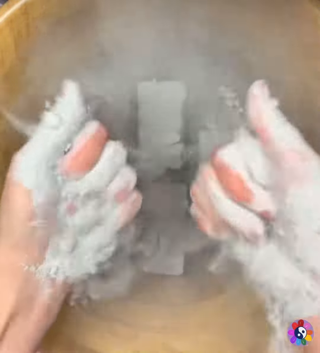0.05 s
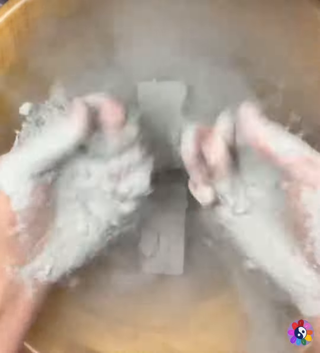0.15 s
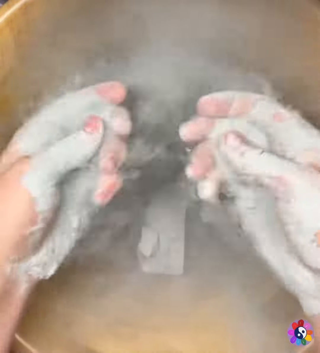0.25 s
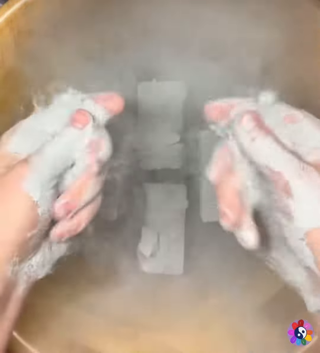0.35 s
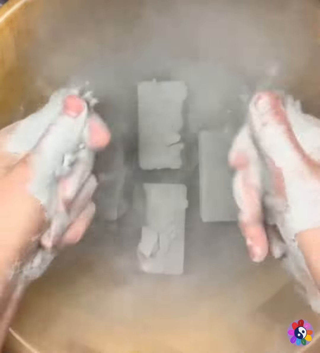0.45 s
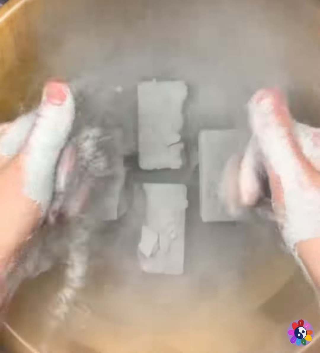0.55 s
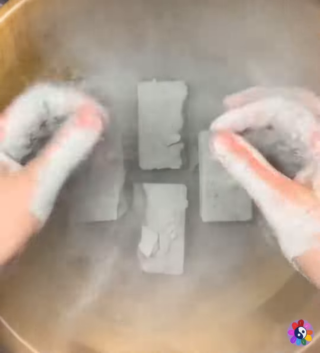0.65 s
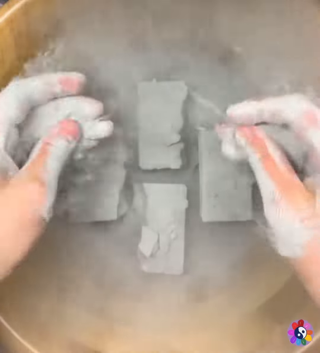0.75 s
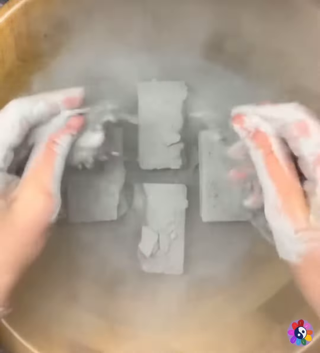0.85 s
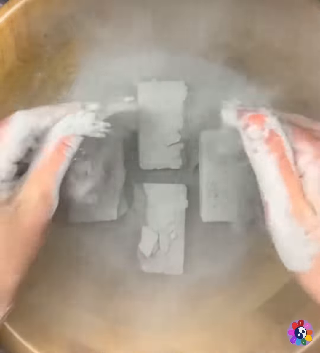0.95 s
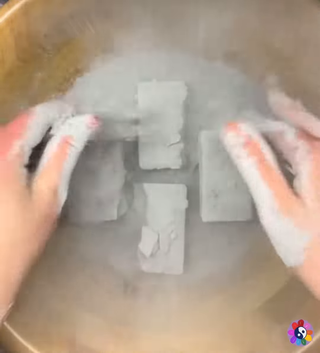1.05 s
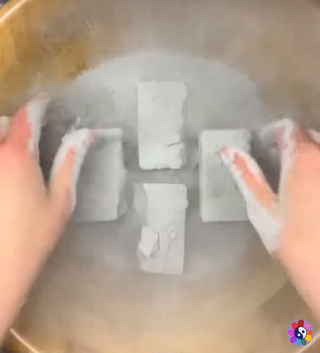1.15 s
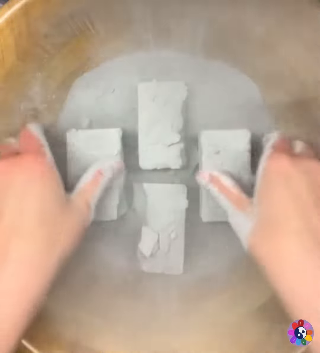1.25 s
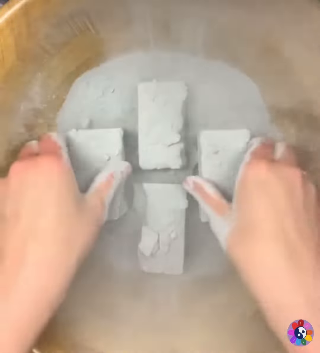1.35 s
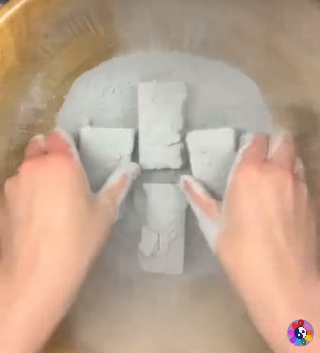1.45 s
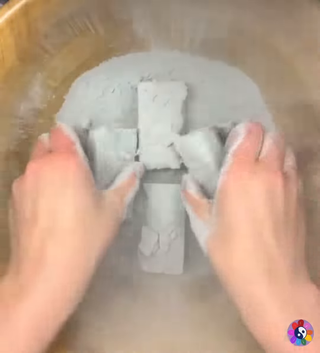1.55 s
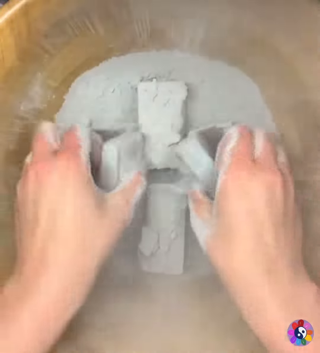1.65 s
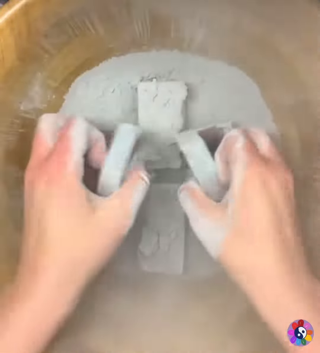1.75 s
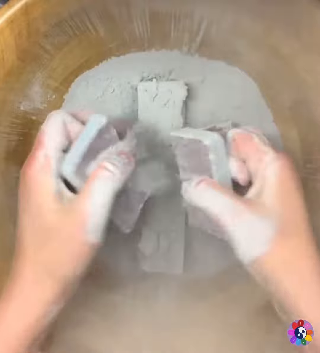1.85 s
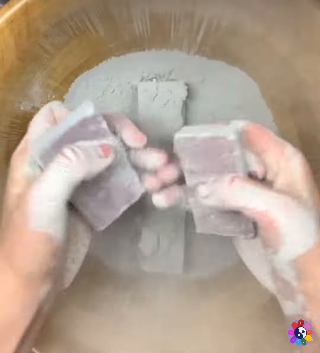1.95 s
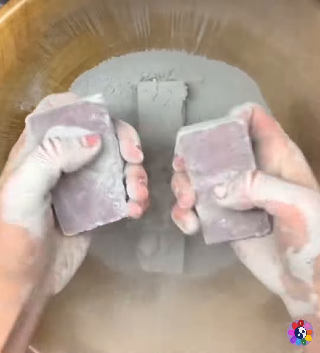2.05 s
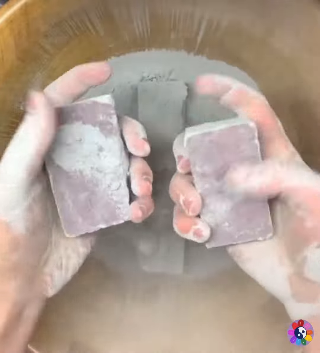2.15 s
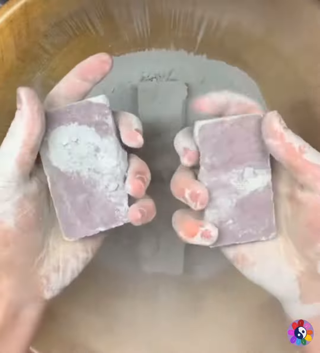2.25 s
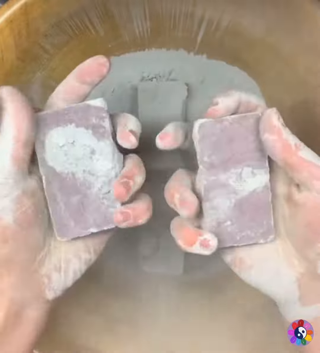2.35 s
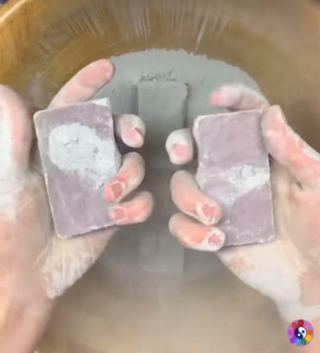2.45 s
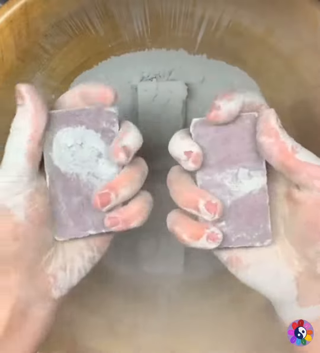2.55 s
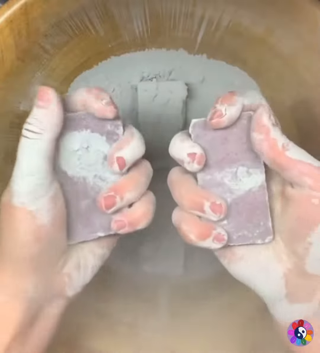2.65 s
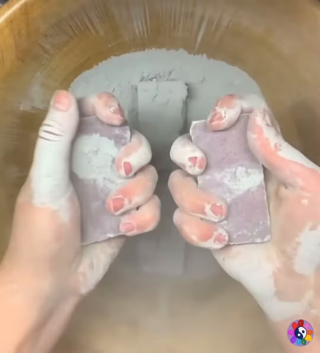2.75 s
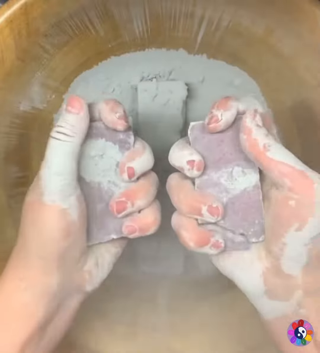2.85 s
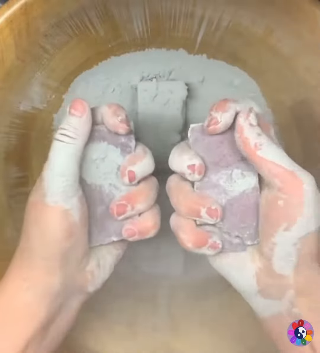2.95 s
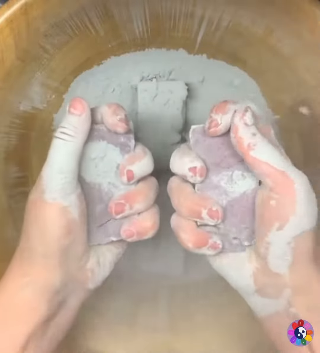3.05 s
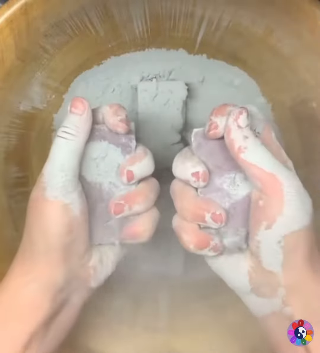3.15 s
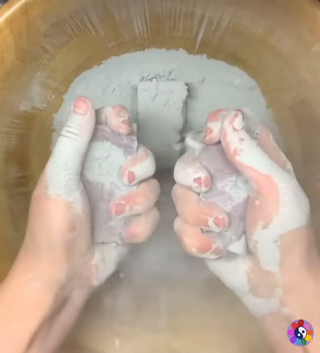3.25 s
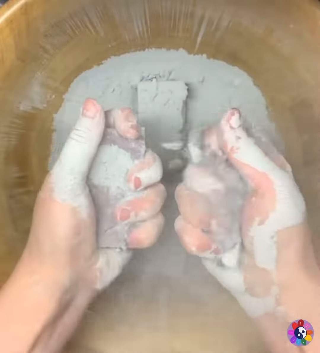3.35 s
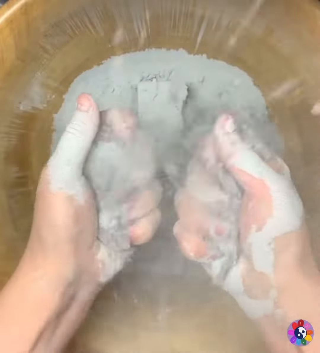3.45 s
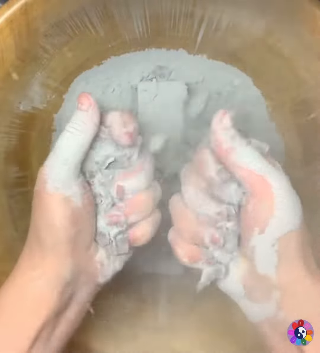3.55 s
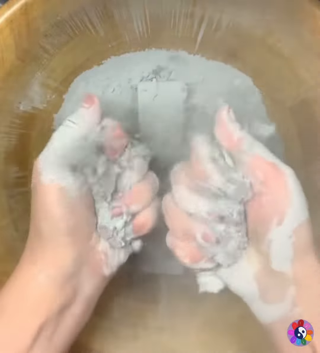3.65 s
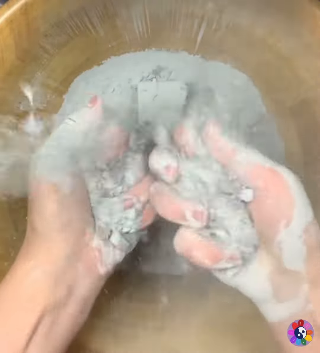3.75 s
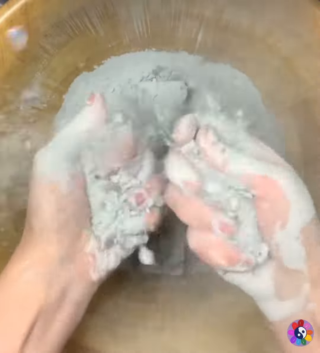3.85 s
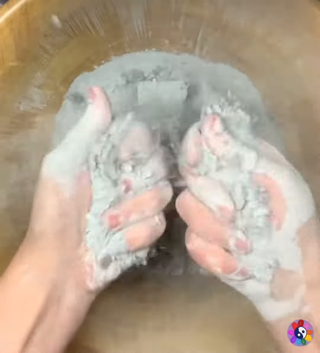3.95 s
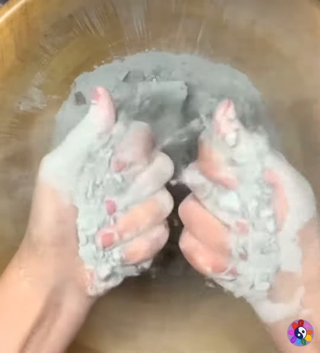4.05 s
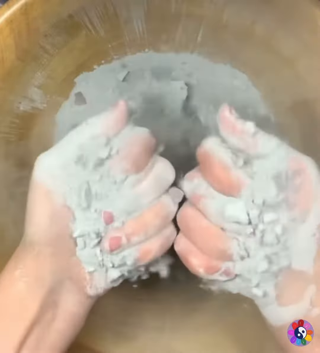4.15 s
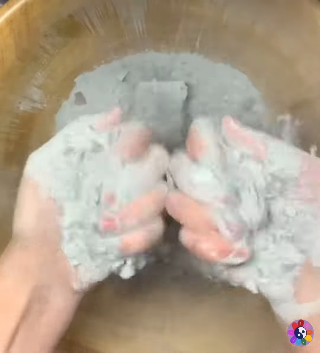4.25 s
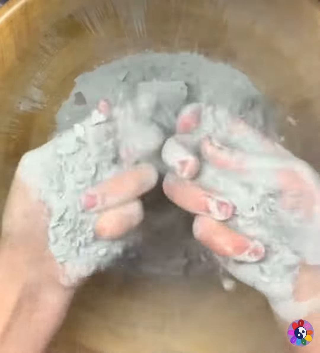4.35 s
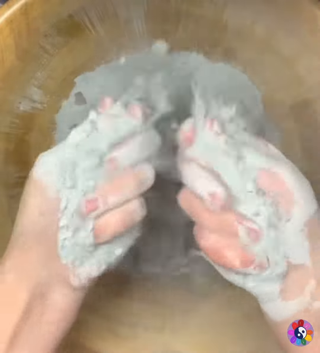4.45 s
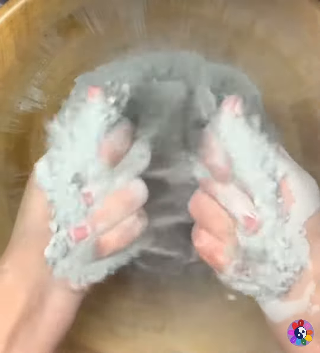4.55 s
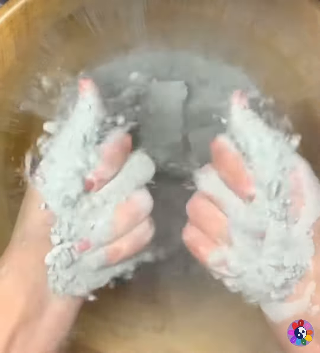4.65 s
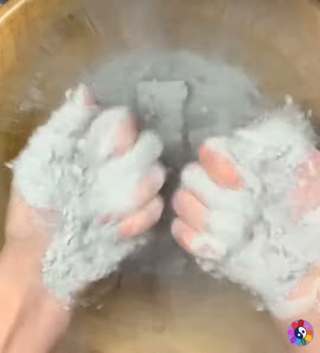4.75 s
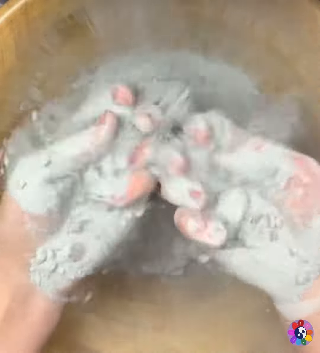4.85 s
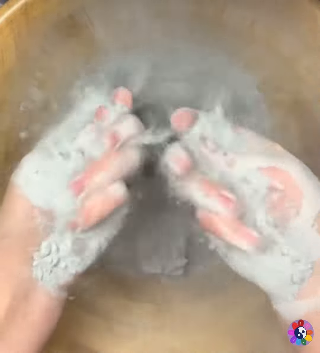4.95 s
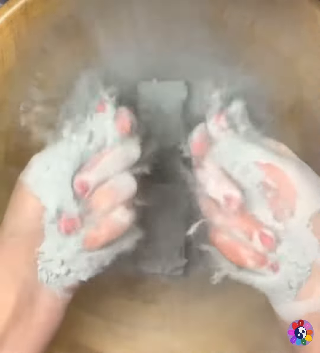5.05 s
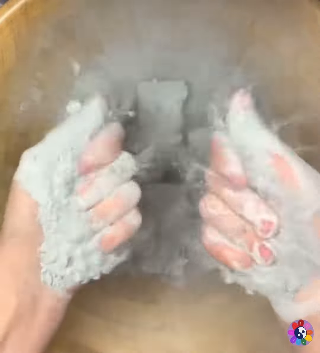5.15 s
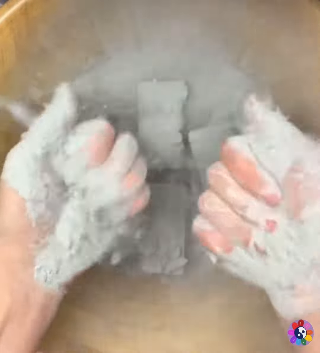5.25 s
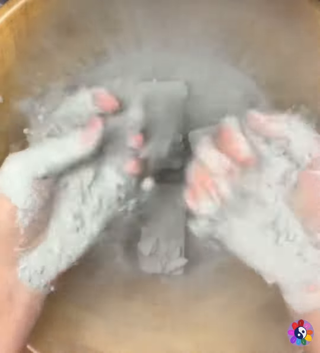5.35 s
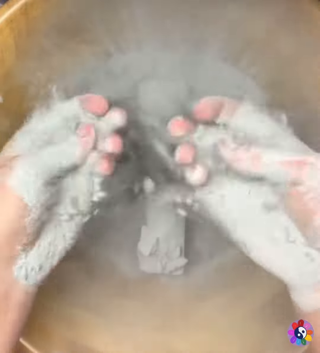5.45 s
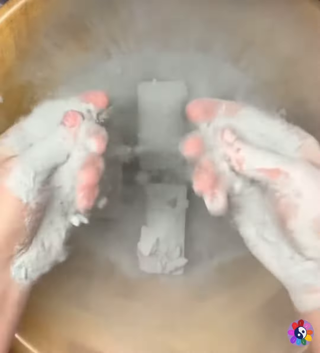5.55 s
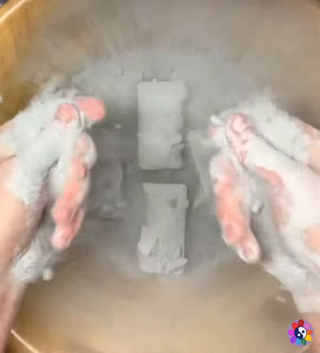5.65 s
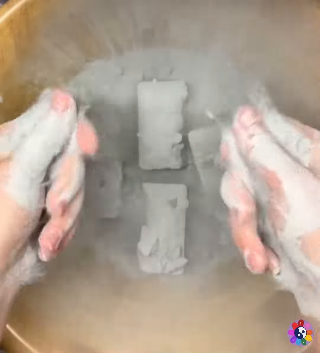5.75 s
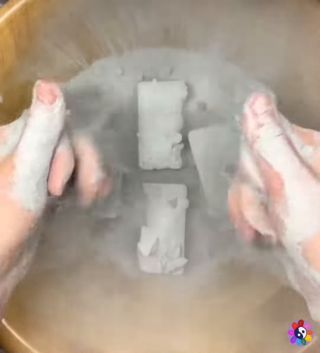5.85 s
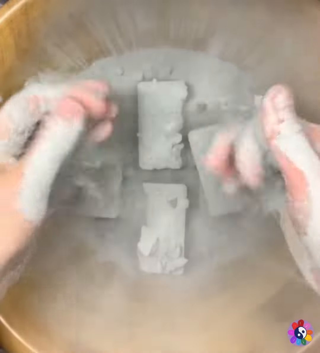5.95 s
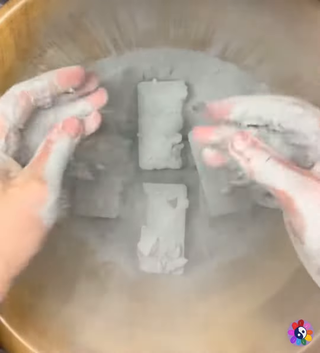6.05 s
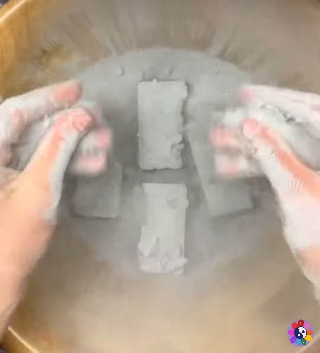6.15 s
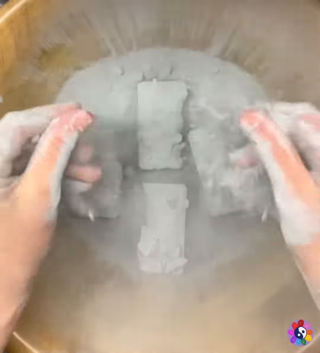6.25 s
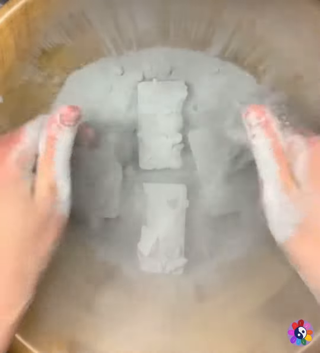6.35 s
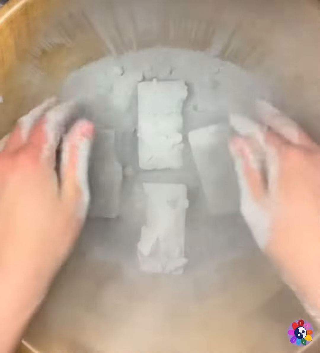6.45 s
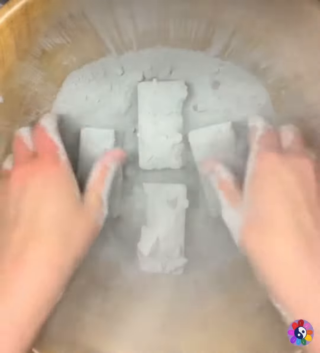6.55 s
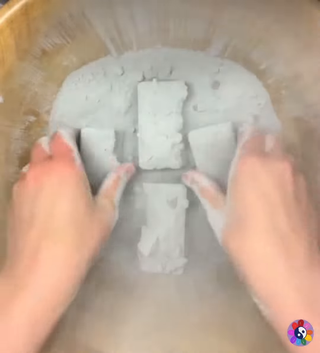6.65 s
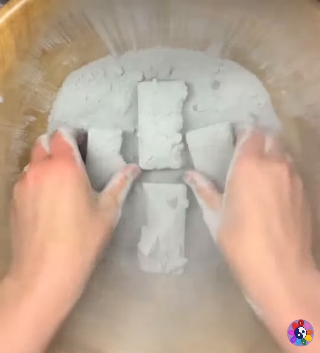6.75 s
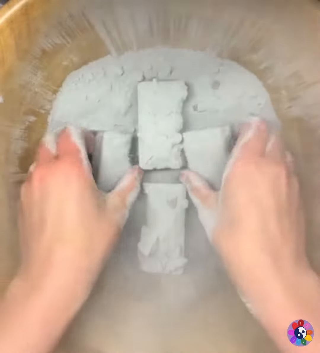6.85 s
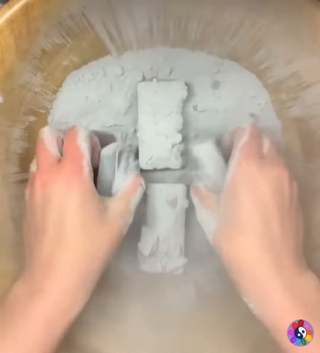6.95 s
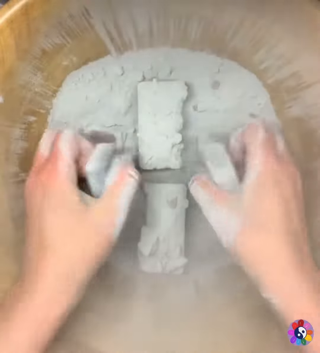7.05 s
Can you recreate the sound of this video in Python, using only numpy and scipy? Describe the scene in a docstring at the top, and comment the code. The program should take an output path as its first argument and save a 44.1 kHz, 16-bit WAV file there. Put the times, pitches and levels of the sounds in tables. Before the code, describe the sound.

Close to the microphone in a quiet room, dry chalk crunches and trickles between fingers into a deep bowl. Several hollow thuds follow as more bars are picked up. After a near-silent moment, the bars snap and are ground to powder, crackling and hissing while crumbs patter on the bowl wall. Softer rubbing follows, and a few heavy bumps nudge the bowl on the table.

```python
"""Grit grinds and trickles as two hands crush dry chalk bars to powder over a deep bowl.
The bars crack in short bursts that ring the bowl's air; lumps and powder thud on its wall,
and heavy contacts shove the bowl on the table. All is heard close up, in stereo,
over a quiet room tone."""
import sys
import numpy as np
from scipy import signal
from scipy.fft import rfft, irfft
from scipy.io import wavfile

SR = 44100
rng = np.random.default_rng(int(sys.argv[2]) if len(sys.argv) > 2 else 0)


def output_pcm(signal):
    """Save a mono or channel-first signal as 16-bit PCM at the path in sys.argv[1].

    Samples are clipped to [-1, 1] before scaling.
    """
    pcm = np.clip(np.atleast_2d(signal).T, -1, 1) * 32767
    wavfile.write(sys.argv[1], SR, np.round(pcm).astype(np.int16))


N = 313110

# bowl wall modes: f/Hz, level/dB, t60/s
WALL_MODES = [(215, -3.5, 0.026), (252.3, -13, 0.15), (291.5, -18, 0.08), (387.2, 0.5, 0.096),
              (438, -1.5, 0.087), (458, -7, 0.11), (548, -4, 0.035), (606.6, -3, 0.049), (640, 0, 0.0044)]
# bowl air resonances: f/Hz, width/Hz, level/dB
AIR_MODES = [(1060, 120, -19), (1660, 170, 0), (2060, 260, -6), (2480, 260, -7), (2850, 260, -6),
             (3320, 250, -4), (4030, 300, -10)]
# fine grit spectrum: f/Hz, density/dB
HISS_SPECTRUM = [(900, -32), (2500, -8), (4500, 2), (7600, -1), (9000, 3), (12000, -2), (15500, 0)]


def cracks():
    """A crack builds, snaps through the bar and dies raggedly; crumbs keep breaking off after it."""
    # cracks: t/s, level/dB, treble share/dB, centre f/Hz
    events = [(0.014, -42, -7.5, 3420), (0.069, -36, -6.5, 3310), (0.2563, -30, -8.5, 3180),
              (0.264, -30, -27, 2600), (0.294, -18.5, -39, 1860), (0.3, -23.5, -33, 2000),
              (0.3073, -36, -33, 1900), (0.423, -37.5, -15.5, 1650), (0.56, -26.5, -17.5, 1610),
              (0.673, -30.5, -17, 3670), (0.849, -29.5, -15, 2030), (1.1291, -33.5, -42, 1620),
              (1.179, -37, -14.5, 1620), (1.531, -43, -10, 1360), (1.595, -39, -15.5, 1350),
              (1.758, -42, -38, 1600), (2.0524, -47, -22, 1790), (2.817, -49, -7.5, 1950),
              (2.9868, -39, -12.5, 3460), (3.0804, -47, -13, 3250), (3.129, -27.5, -16, 2110),
              (3.187, -22.5, -15, 1900), (3.211, -44, -20, 1670), (3.265, -46, -28, 1660),
              (3.292, -40.5, -6.5, 3900), (3.309, -40, -21, 3200), (3.341, -37, -29, 3320),
              (3.355, -24.5, -35, 1650), (3.3621, -30, -19, 2800), (3.371, -33, -15, 1700),
              (3.4048, -26, -24, 1580), (3.426, -27, -21, 2650), (3.473, -35.5, -19, 2900),
              (3.5083, -37, -13, 2010), (3.441, -45, -23, 1700), (3.5782, -30, -16.5, 2560),
              (3.623, -34.5, -11.5, 1730), (3.628, -26, -25, 1540), (3.634, -36, -29, 1590),
              (3.649, -45, -8, 3300), (3.673, -29, -25, 1600), (3.704, -28, -18, 1870),
              (3.754, -40, -21, 2620), (3.7905, -29, -20, 3040), (3.8512, -36, -7, 3260),
              (3.8892, -24, -23, 1530), (3.9464, -26.5, -27, 3300), (3.9555, -24.5, -24, 3320),
              (3.9865, -44, -12, 1610), (4.0184, -28.5, -18, 2320), (4.0256, -35.5, -17, 2600),
              (4.066, -46, -8, 3400), (4.096, -27.5, -15.5, 3040), (4.0998, -51, -25, 2600),
              (4.363, -23.5, -15, 3820), (4.374, -20.5, -19.5, 3560), (4.409, -43, -18, 3300),
              (4.426, -38, -14.5, 1680), (4.457, -48, -13, 3300), (4.469, -40, -5.5, 2600),
              (4.474, -35, -32, 1660), (4.5165, -20, -26, 2490), (4.518, -10, -38, 2160),
              (4.542, -40, -16, 1700), (4.731, -27.5, -20, 2260), (4.777, -32.5, -7, 2900),
              (4.799, -23.5, -17, 2280), (4.8295, -31, -34, 1800), (4.845, -39, -8, 3330),
              (4.9204, -32.5, -6, 3140), (4.9504, -39, -5.5, 1940), (5.2061, -26, -32, 2670),
              (5.467, -33.5, -19.5, 3470), (5.5036, -43, -8.5, 2170), (5.585, -34.5, -17, 3060),
              (6.0352, -36.5, -10, 1920), (6.15, -42, -33, 1560), (6.384, -40, -19, 1680),
              (6.427, -29.5, -15, 2160), (6.53, -37.5, -25, 2760), (6.731, -47.5, -28, 1540),
              (7.003, -29, -32, 1300), (7.057, -31, -27, 1420)]
    rise_s, snap_s, crack_t60_s, crumb_t60_s = 0.0008, 0.000053, 0.019, 0.13
    t = np.arange(int(0.1 * SR)) / SR
    hz, width_hz, air_db = np.transpose(AIR_MODES)
    body, strikes = np.zeros((2, len(hz), N + len(t)))
    treble, ticks = np.zeros((2, N + len(t)))
    since_s = t - 0.006  # the bar parts at 0
    after_s = np.maximum(since_s, 0)
    rise = np.exp(np.minimum(since_s, 0) / rise_s)
    snap = 0.5 * np.exp(-(since_s / snap_s) ** 2)
    decay, crumb_decay = from_db(-60 * after_s / crack_t60_s), from_db(-60 * after_s / crumb_t60_s)
    uneven_db = 1.5 * rng.standard_normal((len(events), len(hz)))
    spurts = np.pad(from_db(3.3 * drift(130)), (0, len(t)), "edge")
    for (s, db, treble_db, centre_hz), own_db in zip(events, uneven_db):
        start = round((s - 0.005) * SR)
        span, parting = slice(start, start + len(t)), start + round(0.006 * SR)
        crumb_share = from_db(-8 - 0.33 * (db + 34))  # smaller under loud cracks
        burst = snap + rise * (decay + crumb_share * crumb_decay * spurts[span])
        # each fragment size favours its own resonance
        mode_gains = from_db(db - 7 * np.log2(hz / centre_hz) ** 2 + own_db)
        body[:, span] += mode_gains[:, None] * burst
        strikes[:, parting] += mode_gains
        treble[span] += from_db(db + treble_db) * burst
        ticks[parting] += from_db(db + treble_db)
    noise = from_db(1.16 * drift(210)) * rng.standard_normal((2, N))
    rasp = 0
    struck = from_db(-15) * ring(strikes[1, :N], hz[1], t60_s=0.07)  # main resonance lingers
    for k in range(len(hz)):
        gain = (-1) ** k * from_db(air_db[k])
        rasp += gain * resonance(body[k, :N] * noise, hz[k], width_hz[k])
        struck += gain * ring(strikes[k, :N], hz[k], t60_s=1.55 / width_hz[k])
    # small fragments radiate little below the main resonance
    air = butter(rasp + from_db(-5) * struck * [[1], [0.4]], 1400, "high")
    jolt = butter(body[0, :N] * noise, [250, 1000], "band")  # the bar jolts in the hand
    tick = butter(ticks[:N], 3000, "high") * [[1], [0.3]]
    hiss = treble[:N] * unit_rms(colour(noise, HISS_SPECTRUM[:3] + [(16000, -6.5)]))
    return from_db(6) * air + from_db(-9) * jolt + from_db(8) * tick + from_db(5.5) * hiss


def thuds():
    """A lump gives a short pat at its own pitch and leaves the nearby wall modes ringing."""
    # lumps and fingers on the bowl: t/s, level/dB, centre f/Hz
    knocks = [(0.096, -37.5, 347), (0.148, -36, 416), (.296, -21.5, 450), (0.332, -33.5, 464),
              (.443, -34, 450), (.56, -35, 424), (0.676, -35.5, 404), (0.713, -39.5, 400),
              (0.772, -37, 394), (1.145, -31.5, 423), (1.473, -42, 390), (1.527, -31.5, 374),
              (1.558, -35, 406), (1.597, -17, 414), (1.602, -18.5, 380), (1.622, -24.5, 408),
              (1.674, -20, 366), (1.695, -19, 380), (1.72, -32.5, 356), (1.748, -36.5, 395),
              (2.052, -42.5, 394), (2.815, -38.5, 290), (2.986, -47, 660), (3.187, -24.5, 510),
              (3.368, -24.5, 736), (3.403, -32.5, 660), (3.424, -31, 580), (3.441, -32, 590),
              (3.478, -20, 409), (3.522, -31, 406), (3.6, -35, 330), (3.623, -33, 375), (3.656, -28, 415),
              (3.674, -25.5, 424), (3.774, -26.5, 430), (3.812, -34, 412), (3.827, -28.5, 400),
              (3.891, -25.5, 548), (3.909, -23.5, 440), (3.953, -29.5, 422), (3.98, -24, 434),
              (4.121, -18.5, 432), (4.306, -29, 413), (4.321, -25, 403), (4.41, -26.5, 407),
              (4.436, -28, 430), (4.496, -35, 453), (4.517, -26, 400), (4.556, -29.5, 397),
              (4.659, -31.5, 417), (4.68, -33.5, 420), (4.708, -35, 422), (4.732, -29.5, 443),
              (4.756, -31, 418), (4.8, -25.5, 520), (4.923, -27.5, 477), (5.207, -30, 426),
              (5.312, -35.5, 392), (5.333, -40, 420), (5.673, -38, 380), (5.716, -35.5, 390),
              (5.51, -34.5, 610), (5.539, -32.5, 620), (5.793, -37.5, 372), (5.918, -36, 420),
              (5.973, -29.5, 345), (6.034, -33, 420), (6.361, -33.5, 387), (6.411, -37.5, 387),
              (6.428, -27.5, 377), (6.461, -35, 342), (6.664, -30, 440), (6.673, -33, 371),
              (6.86, -31, 344), (6.887, -30, 373), (6.906, -27, 460), (6.922, -23.5, 480),
              (6.943, -12.5, 381), (7.004, -26, 450), (7.059, -8, 515)]
    crumbs_per_s, sag_s, pat_rise_s, pat_t60_s, lag_s = 27, 0.0021, 0.0017, 0.023, 0.002295
    # small crumbs drop at random, as loud as the powder allows
    when, size, octaves = rng.random((round(crumbs_per_s * N / SR), 3)).T
    _, _, powder_gain = effort()
    crumb_db = 20 * np.log10(powder_gain[(when * N).astype(int)]) + 5 - 7.1 * np.log(size + 0.02)
    crumbs = np.transpose([when * (N - 1) / SR, crumb_db, 330 * 2 ** octaves])
    s, hit_db, centre_hz = np.transpose(np.vstack([knocks, crumbs]))
    starts = np.round(s * SR).astype(int)
    t = np.arange(int(0.044 * SR)) / SR
    uneven, side, lag = rng.standard_normal((len(starts), len(WALL_MODES), 3)).T
    sagging_s = t + 0.45 * sag_s * (1 - np.exp(-t / sag_s))  # pitch drops as the lump settles
    pat = (1 - np.exp(-(t / pat_rise_s) ** 2)) * from_db(0.5 - 60 * t / pat_t60_s)
    out = np.zeros((2, N + len(t)))
    for i, db, hz, share in zip(starts, hit_db, centre_hz, side[0]):
        phase = 2 * np.pi * hz * sagging_s
        out[:, i:i + len(t)] += from_db(db) * pat * [np.sin(phase), 0.37 * share * np.cos(phase)]
    out = out[:, :N]
    for k, (hz, db, t60_s) in enumerate(WALL_MODES):
        detune_db = -14 * np.log2(hz / centre_hz) ** 2
        gain = from_db(hit_db + db + detune_db - 16.5 + 2 * uneven[k])
        late = (np.abs(lag[k]) * lag_s * SR).astype(int)  # the push reaches each mode at its own time
        clicks = np.zeros((2, N))
        clicks[:, np.minimum(starts + late, N - 1)] = [gain, gain * side[k]]
        out += ring(clicks, hz, t60_s)
    return cushion(out)


def grinding():
    """Fine grit hisses, coarse grit sounds through the bowl's air, falling powder drums the wall."""
    fine_gain, coarse_gain, powder_gain = effort()
    grit = grains(per_s=300, spread_db=6, burst_s=0.0032, bed=1.47)
    hiss = unit_rms(colour(grit + 2.5 * rng.standard_normal((2, N)), HISS_SPECTRUM))
    edges_hz = np.geomspace(700, 18000, num=9)
    # grain sizes come and go, so each band swells on its own
    fine = sum((-1) ** k * from_db(2 * drift(25)) * butter(hiss, band_hz, "band")
               for k, band_hz in enumerate(zip(edges_hz, edges_hz[1:])))
    coarse = sum((-1) ** k * from_db(db + 3.3 * drift(14)) * resonance(grit, hz, width_hz)
                 for k, (hz, width_hz, db) in enumerate(AIR_MODES))
    powder = grains(per_s=90, spread_db=3.5, burst_s=0.006, bed=0.96) * powder_gain
    drum = cushion(sum((-1) ** k * from_db(db) * ring(powder, hz, t60_s)
                       for k, (hz, db, t60_s) in enumerate(WALL_MODES)))
    crunch = butter(powder[::-1], [720, 1350], "band")  # collapsing lumps
    falling = from_db(-3) * unit_rms(drum) + from_db(-12) * unit_rms(crunch)
    return fine * fine_gain + unit_rms(coarse) * coarse_gain + falling * np.sqrt(np.mean(powder ** 2))


def effort():
    """Gains of fine grit, coarse grit and powder: steady work plus rubs that swell and fade."""
    # steady work: t/s, trickling grit/dB, drumming powder/dB
    work = [(0, -53.5, -60), (.75, -57, -65), (1.21, -58, -65), (1.281, -80, -94.5), (1.42, -76, -68),
            (1.62, -98, -62), (1.8, -61.5, -70), (1.958, -80, -89.5), (2.16, -81, -90), (3.02, -82, -93),
            (3.2, -55.5, -67.5), (3.45, -55, -61.5), (4.1, -58, -54), (4.22, -57, -59.5), (4.8, -58, -58.5),
            (5.3, -57, -62), (6.03, -65.5, -61.5), (6.3, -68, -73), (6.54, -53.5, -67.5),
            (6.64, -75.5, -63.5), (6.9, -60.5, -58), (7.1, -55, -62)]
    # fingers rubbing chalk: peak t/s, length/s, level/dB, coarse share/dB
    rubs = [(0, 0.19, -49.5, 1), (0.213, 0.027, -44, -19), (0.61, 0.7, -50, -3), (0.885, 0.32, -48, -13),
            (1.218, 0.1, -48, -4.5), (1.517, 0.11, -53, -6.5), (1.731, 0.61, -52, -9.5),
            (2.06, 0.15, -49, -15), (2.404, 0.19, -59, -15), (2.33, 0.24, -68.5, -15.5),
            (2.571, 0.75, -75.5, -2), (2.832, 0.08, -66, -17.5), (2.958, 0.15, -62.5, -6),
            (3.127, 0.21, -49.5, -12), (3.191, 0.068, -48, 7.5), (3.38, 0.17, -44.5, -4),
            (3.632, 0.99, -49, -4), (3.998, 0.81, -50, -0.5), (4.372, .1, -53, -15), (4.537, 0.19, -48, 2),
            (4.741, 0.18, -41, -3.5), (4.936, 0.52, -46, -1), (5.187, 0.32, -51, 0.5),
            (5.528, 0.77, -53, -3), (5.818, 0.61, -50.5, -4), (5.925, 0.41, -51.5, -7),
            (6.208, 0.31, -47.5, -7), (6.328, 0.24, -48.5, -10), (6.437, 0.18, -43.5, -2),
            (6.919, 0.096, -46, -4)]
    rise_share, swing_db = 0.51, 26.5
    t = np.arange(N) / SR
    s, grit_db, powder_db = np.transpose(work)
    fine, powder = from_db(np.interp(t, s, grit_db)), from_db(np.interp(t, s, powder_db))
    coarse = np.hypot(fine * from_db(-6), powder * from_db(-4.5))
    for peak_s, length_s, db, coarse_db in rubs:
        span = slice(max(int((peak_s - 2 * length_s) * SR), 0), int((peak_s + 2 * length_s) * SR))
        offset = (t[span] - peak_s) / length_s
        rub = from_db(db - swing_db * np.maximum(-offset / rise_share, offset / (1 - rise_share)))
        fine[span] = np.hypot(fine[span], rub)
        coarse[span] = np.hypot(coarse[span], rub * from_db(coarse_db))
    return fine, coarse, powder


def grains(per_s, spread_db, burst_s, bed):
    """Tiny dying noise bursts over a smooth bed; two unrelated noises share one envelope."""
    born = rng.random(N) < per_s * from_db(5 * drift(15)) / SR
    sizes = from_db(spread_db * np.minimum(rng.exponential(1, N), 4))
    pole = np.exp(-1 / (burst_s * SR))
    bursts = signal.lfilter([1], [1, -pole], born * sizes + 1e-18)
    return (bed + unit_rms(bursts)) * rng.standard_normal((2, N))


def shoves():
    """Heavy contacts shift the bowl on the table: a dull push that swells and is soon damped."""
    # pushes: t/s, level/dB, f/Hz
    pushes = [(1.595, -42, 198), (1.696, -42, 165), (2.816, -55, 246), (3.186, -47, 248), (3.369, -54, 145),
              (3.408, -49.5, 146), (3.474, -47, 254), (3.595, -54, 175), (3.775, -59, 176),
              (3.817, -45.5, 232), (3.892, -60, 210), (3.975, -49.5, 203), (4.118, -56, 246),
              (4.308, -53.5, 235), (4.411, -51, 250), (4.519, -48, 244), (5.513, -48, 203),
              (6.672, -52.5, 208), (6.943, -43, 251), (7.005, -47, 215), (7.057, -36, 247)]
    rise_s, t60_s = 0.0058, 0.079
    t = np.arange(int(0.08 * SR)) / SR
    swell = np.sin(np.pi / 2 * np.minimum(t / rise_s, 1)) ** 2
    decay = from_db(-60 * np.maximum(t - rise_s, 0) / t60_s)
    out = np.zeros(N + len(t))
    for s, db, hz in pushes:
        i = round(s * SR)
        out[i:i + len(t)] += from_db(db) * swell * decay * np.sin(2 * np.pi * hz * t)
    return out[:N] * [[1], [0.3]]


def room_tone():
    """Faint, steady low noise."""
    # room spectrum: f/Hz, density/dB
    spectrum = [(21, -59), (35, -8), (85, -8), (124, -11), (149, -15), (426, -20.5), (573, -46), (699, -30),
                (2040, -35.5), (4000, -39.5), (8800, -100)]
    return from_db(-76.5) * unit_rms(colour(rng.standard_normal((2, N)), spectrum))


def cushion(x):
    """Powder softens each wall contact, and so small a bowl radiates no deep bass."""
    return butter(butter(x, 720, "low", order=4), 190, "high", order=4)


def stereo_image(mid_side):
    """Stereo image: left-right likeness, balance and phase vary with frequency."""
    # stereo likeness: f/Hz, likeness/0-1, left minus right/dB
    stereo_likeness = [(60, .92, -.5), (400, .97, -1), (750, .8, -1), (1000, .4, -3), (1700, .8, -2.5),
                       (3300, .8, 0), (4400, .97, 0), (5000, .97, 0), (5600, .45, 0), (6300, .97, 0),
                       (7300, .98, 0), (7800, .5, 0), (8500, .97, 0), (9300, .97, 0), (10000, .4, 0),
                       (11000, .93, 0), (11900, .4, 0), (12500, .97, 0), (13600, .97, 0), (14100, .3, 0),
                       (15200, .9, 0)]
    # stereo phase: f/Hz, left lead/rad
    stereo_phase = [(0, 0), (900, -1.1), (1600, .8), (3500, 1.5), (4400, 3.1), (5100, 3.2), (6100, 6.2),
                    (7500, 6.4), (8300, 9.3), (9500, 9.5), (9900, 7.9), (10700, 9.3), (11400, 9.5),
                    (12300, 12.5), (13800, 12.6), (14700, 15.7)]
    bins_hz = np.fft.rfftfreq(N, 1 / SR)
    hz, likeness, tilt_db = np.transpose(stereo_likeness)
    likeness = np.interp(bins_hz, hz, likeness)
    lead_rad = np.interp(bins_hz, *np.transpose(stereo_phase))
    skew = from_db(np.interp(bins_hz, hz, tilt_db) / 2) * np.exp(0.5j * lead_rad)
    mid, side = rfft(mid_side) * np.sqrt([(1 + likeness) / 2, (1 - likeness) / 2])
    return irfft([(mid + side) * skew, (mid - side) / skew], N)


def ring(x, hz, t60_s):
    """Damped mode: a unit click starts a sine of height 1."""
    r, w = from_db(-60 / (t60_s * SR)), 2 * np.pi * hz / SR
    return signal.lfilter([0, np.sin(w)], [1, -2 * r * np.cos(w), r * r], x + 1e-18)


def resonance(x, hz, width_hz):
    """Band-pass with peak gain 1."""
    r, w = np.exp(-np.pi * width_hz / SR), 2 * np.pi * hz / SR
    return signal.lfilter([(1 - r * r) / 2, 0, (r * r - 1) / 2], [1, -2 * r * np.cos(w), r * r], x + 1e-18)


def drift(rate_hz):
    """Slow random wander, rms 1."""
    r = np.exp(-2 * np.pi * rate_hz / SR)
    return unit_rms(signal.lfilter([1], [1, -2 * r, r * r], rng.standard_normal(N + 9000))[9000:])


def colour(x, spectrum):
    """Filter by a curve of f/Hz, gain/dB."""
    hz, db = np.transpose(spectrum)
    bins_hz = np.fft.rfftfreq(N, 1 / SR) + 1
    return irfft(rfft(x) * from_db(np.interp(np.log(bins_hz), np.log(hz), db)), N)


def butter(x, hz, kind, order=2):
    return signal.sosfilt(signal.butter(order, hz, kind, fs=SR, output="sos"), x)


def from_db(db):
    return 10 ** (np.asarray(db) / 20)


def unit_rms(x):
    return x / np.sqrt(np.mean(x ** 2) + 1e-20)


def scene():
    """Chalk, bowl and room, summed as mid and side, then spread to left and right."""
    return stereo_image(grinding() + cracks() + thuds() + shoves() + room_tone())


def record(dry):
    """Steep treble cut."""
    stop_db, stop_hz = 70, 16150
    return signal.sosfilt(signal.cheby2(22, stop_db, stop_hz, fs=SR, output="sos"), dry)


dry = scene()
out = record(dry)
output_pcm(out)
```